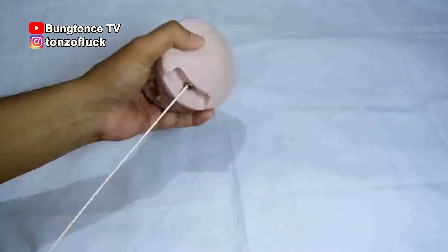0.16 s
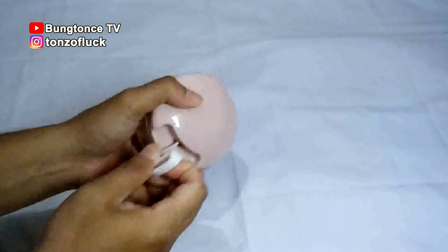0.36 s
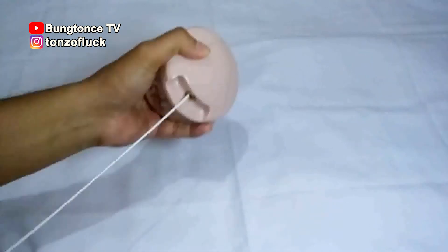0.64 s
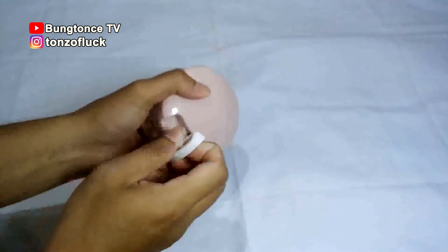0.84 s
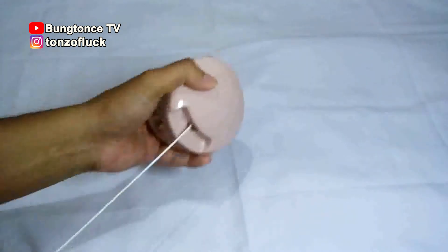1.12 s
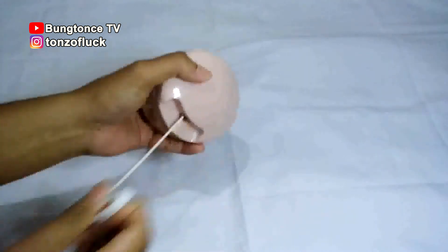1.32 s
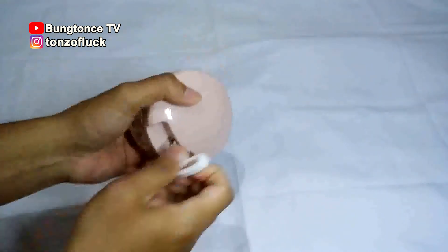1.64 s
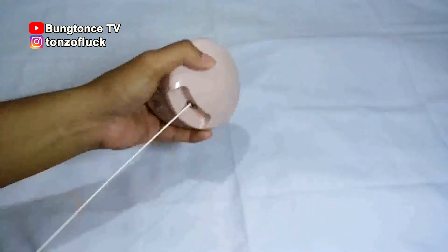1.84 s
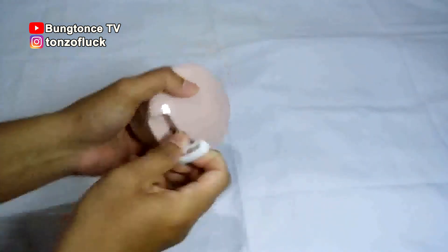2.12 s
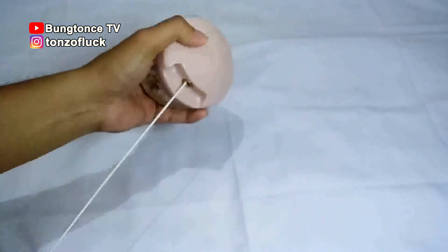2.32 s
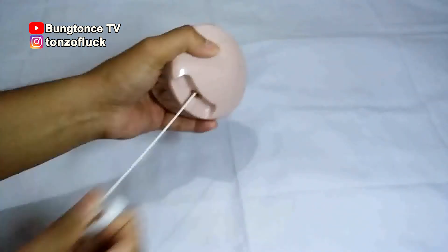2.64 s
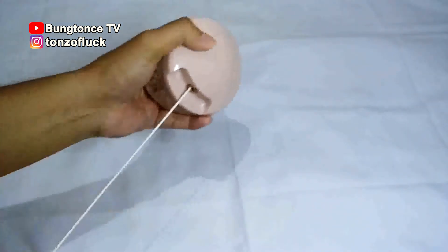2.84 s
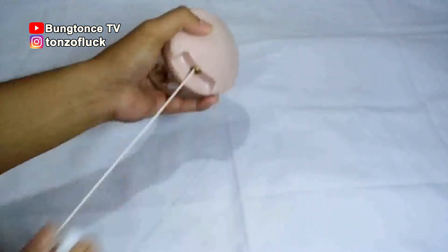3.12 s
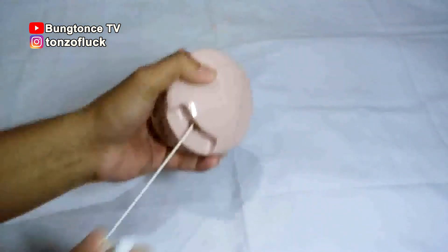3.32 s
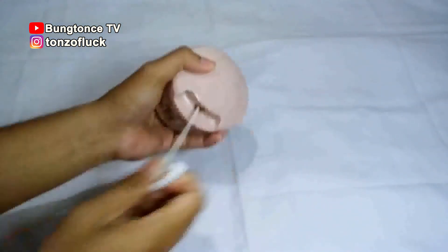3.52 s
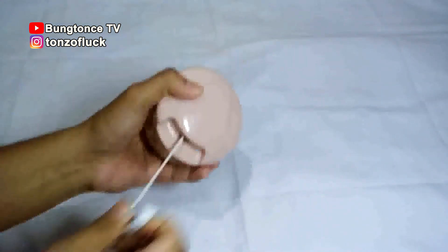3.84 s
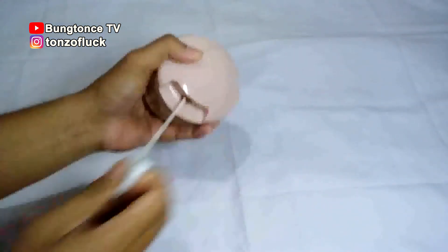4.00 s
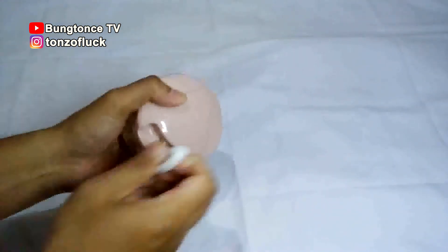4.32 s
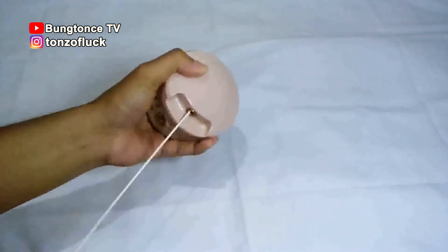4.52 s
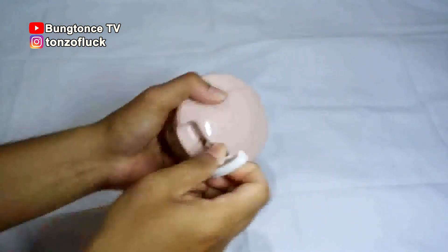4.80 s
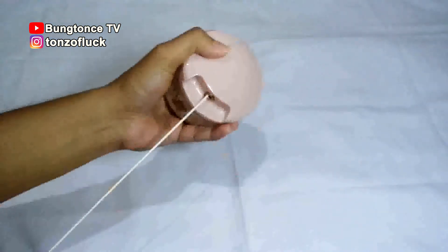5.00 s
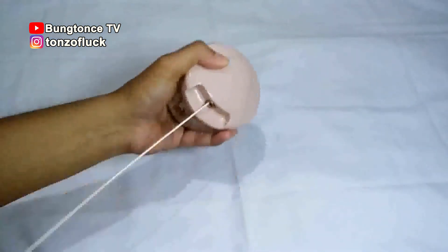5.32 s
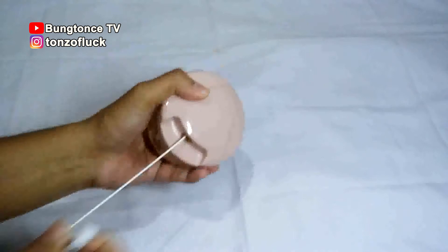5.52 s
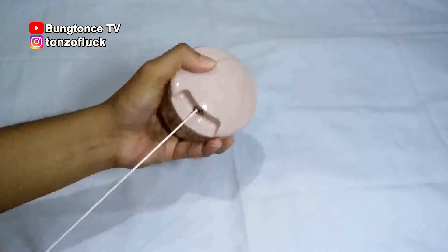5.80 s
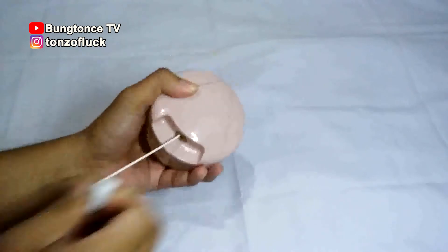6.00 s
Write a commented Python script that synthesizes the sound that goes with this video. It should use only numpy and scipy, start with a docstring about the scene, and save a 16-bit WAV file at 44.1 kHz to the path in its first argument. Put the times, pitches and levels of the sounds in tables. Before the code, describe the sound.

Close to the microphone in a small, quiet room, a cord zips back into a manual food chopper, its ratchet ticking fast. The cord is pulled, the mechanism catches with a clack, and vegetable pieces tumble against the blades and plastic jar in a gritty, knocking rattle. Rewind and pull alternate briskly, a little more than twice a second, ending on one last rasping rewind.

```python
"""A hand-held pull-cord food chopper, worked with fourteen quick pulls close to the microphone in a small room.
Its spring winds the cord in before and after each pull: the cord rasps and sings through the lid
while the pawl ticks over its ratchet. Each pull takes up the slack, the pawl catches with a clack,
and the blades knock vegetable pieces round the plastic jar. Faint room tone lies underneath."""
import sys
import numpy as np
from scipy import signal
from scipy.fft import rfft, irfft
from scipy.io import wavfile
from scipy.ndimage import uniform_filter1d, minimum_filter1d

SR = 44100
rng = np.random.default_rng(int(sys.argv[2]) if len(sys.argv) > 2 else 0)


def store_pcm(level_fs):
    """Save levels as 16-bit WAV."""
    pcm = np.round(np.clip(level_fs, -1, 1) * 32767).astype(np.int16)
    wavfile.write(sys.argv[1], SR, np.atleast_2d(pcm).T)


N = 271656
TIME = np.arange(N) / SR
BLOW_S = .005   # a blow's level is its energy spread over this time


def from_db(db):
    """Decibels to gain."""
    return 10 ** (np.asarray(db) / 20)


def rms_one(x):
    """Scale to an rms of 1."""
    return x / np.sqrt(np.mean(x ** 2) + 1e-20)


def unit_energy(x):
    """Scale to an energy of 1."""
    return x / np.sqrt(np.sum(x ** 2) + 1e-20)


def response(modes, scatter_db=0, detune=0, size=2048):
    """Ring of a part; where it is struck scatters the strengths and pitches of its resonances."""
    hz, width, db = np.transpose(modes)[:, :, None]
    hz = hz * (1 + detune * rng.standard_normal(hz.shape))
    strength = from_db(db + scatter_db * rng.standard_normal(db.shape))
    grid_hz = np.arange(size // 2 + 1) * SR / size
    peaks = strength / (1 + (2 * (grid_hz - hz) / width) ** 2)
    cepstrum = irfft(np.log(np.sum(peaks ** 2, axis=0)) / 2)
    cepstrum[1:size // 2] *= 2   # folding the cepstrum gives minimum phase: nothing sounds early
    cepstrum[size // 2 + 1:] = 0
    return unit_energy(irfft(np.exp(rfft(cepstrum))))


def through(force, modes):
    """A force played through a part's resonances."""
    return signal.oaconvolve(force, response(modes))[:N]


def soften(x, cut_hz):
    """Low-pass: soft contacts and walls lose their treble."""
    return signal.sosfilt(signal.butter(2, cut_hz, fs=SR, output="sos"), x)


def grains(per_s, spread_db):
    """Random tiny contacts of uneven size; rms 1."""
    sizes = from_db(spread_db * np.clip(rng.standard_normal(N), -2, 2))
    signs = rng.choice([-1, 1], N)
    return rms_one(sizes * signs * (rng.random(N) < per_s / SR))


def latest(rows):
    """At every moment: the time since a table's latest event began, then that event's other columns."""
    starts, *columns = np.transpose(rows)
    index = np.maximum(np.searchsorted(starts, TIME, side="right") - 1, 0)
    return [TIME - starts[index]] + [column[index] for column in columns]


def rasp_gain(age, rise_s, slow_s, peak_db, climb_db=11, fall_db=19, creep_db=-43, fade_db_per_s=90):
    """Each return is an arch: the spool speeds up, the hand slows it, the last of the cord creeps in."""
    rising = peak_db - climb_db * (1 - age / rise_s) ** 2
    slowing = peak_db - fall_db * ((age - rise_s) / slow_s) ** 2
    creeping = creep_db - fade_db_per_s * (age - rise_s - slow_s)
    return from_db(np.where(age < rise_s, rising, np.maximum(slowing, creeping)))


def ratchet_ticks(speed, slow_per_s, fast_per_s, jitter, spread_db):
    """One tick a tooth, closer together as the spool spins faster; rms 1."""
    per_s = slow_per_s + (fast_per_s - slow_per_s) * speed
    teeth_passed = np.floor(np.cumsum(per_s) / SR)
    at = np.flatnonzero(np.diff(teeth_passed))
    late, strength = rng.standard_normal((len(at), 2)).T
    moved = np.clip(at + jitter * late * SR / per_s[at], 0, N - 1).astype(int)
    ticks = np.zeros(N)
    ticks[moved] = from_db(spread_db * np.clip(strength, -2, 2)) / np.sqrt(per_s[at])
    return rms_one(ticks)


def chatter(ticks, decay_s):
    """The pawl chatters briefly on each tooth that it drops from; rms 1."""
    decay = np.exp(-1 / (decay_s * SR))
    envelope = signal.lfilter([1], [1, -decay], ticks + 1e-18)
    return rms_one(envelope * rng.standard_normal(N))


def singing(speed, rest_hz, rise, width_hz):
    """The cord sticks and slips in its eye: an unsteady narrow zing that sharpens with speed; rms 1."""
    waver = soften(rng.standard_normal(N) + 1j * rng.standard_normal(N), width_hz)
    phase = 2 * np.pi * np.cumsum(rest_hz * (1 + rise * speed)) / SR
    return rms_one(np.real(waver * np.exp(1j * phase)))


# the cord's returns: (start [s], speeding up [s], slowing [s], rasp peak [dB], relative singing [dB])
CORD_RETURNS = [(-.06, 0.057, 0.11, -26, -10), (0.356, 0.035, 0.13, -27.5, -22),
                (.78, 0.059, 0.11, -25.5, -11), (1.215, 0.071, 0.11, -26.5, -10.5),
                (1.638, .057, 0.12, -26, -18), (2.066, .06, 0.1, -26.5, -3), (2.5, 0.051, 0.12, -26, -21),
                (2.955, 0.052, 0.14, -27, -12), (3.383, 0.064, 0.12, -26.5, -26),
                (3.843, 0.077, 0.11, -24, -11), (4.305, .06, 0.11, -26.5, -31),
                (4.728, 0.048, 0.14, -27, -4), (5.16, 0.046, 0.12, -25.5, -16),
                (5.582, 0.061, 0.12, -25, -7), (6.025, 0.062, 0.12, -26, -8.5)]
# resonances of the spool and of the ratchet: (frequency [Hz], width [Hz], level [dB])
SPOOL_MODES = [(347, 140, -8), (510, 64, -4.5), (750, 210, 2), (1023, 360, 1), (1230, 250, 0.5),
               (1510, 600, -5.5), (2215, 970, -5.5)]
RATCHET_MODES = [(3455, 1330, -8.5), (4410, 400, -3.5), (5130, 1100, -3), (5604, 470, 0.5),
                 (5940, 330, -6.5), (7000, 1450, -17.5), (8160, 470, -19), (9000, 2230, -20),
                 (11540, 2200, -27), (14000, 2100, -30.5)]
def rewind():
    """The spring spins the spool back: the pawl ticks and the cord rubs and sings through its eye."""
    age, rise_s, slow_s, peak_db, sing_db = latest(CORD_RETURNS)
    rasp = rasp_gain(age, rise_s, slow_s, peak_db)
    speed = np.sqrt(rasp / rasp.max())
    rumble = from_db(-4) * rasp ** .96   # the spool's rumble grows more slowly than the rasp
    ticks = ratchet_ticks(speed, slow_per_s=55, fast_per_s=190, jitter=.1, spread_db=2.4)
    ticks = chatter(ticks, decay_s=.00075) * np.sqrt(speed)   # a slow spool lets the pawl down gently
    spool = through(.17 * ticks + 1.083 * grains(per_s=1800, spread_db=6), SPOOL_MODES)
    rubbing = grains(per_s=3000, spread_db=2.5)
    ratchet = through(.78 * soften(ticks, cut_hz=15000) + .62 * rubbing, RATCHET_MODES)
    zing = singing(speed, rest_hz=5500, rise=.045, width_hz=75)
    zing *= speed ** 2 * from_db(5 + sing_db)   # only a fast cord sings
    return (1 - pulling(turn_s=.0054)) * (rumble * spool + rasp * (ratchet + zing))


def room(x, t60_s=.26, level_db=-14.5, size=16384):
    """The small room answers with a short tail, 3 ms behind the direct sound, from the nearest surface."""
    age = np.arange(size) / SR
    tail = rng.standard_normal(size) * from_db(-60 * age / t60_s) * (age > .003)
    tail = unit_energy(soften(tail, cut_hz=16600))
    return from_db(level_db) * signal.oaconvolve(x, tail)[:N]


# bands of the room's still air: (frequency [Hz], width [Hz], level [dB])
AIR_BANDS = [(64, 160, -3), (130, 260, -18), (800, 1100, -11), (4000, 2600, -8.5)]
def room_tone(level_db=-53.5):
    """Still air round the microphone: a faint, steady rumble and hiss."""
    return from_db(level_db) * through(rng.standard_normal(N), AIR_BANDS)


def strokes():
    """Start, catch and end of each pull, in seconds; a pull ends as the next return begins."""
    cycles = zip(CORD_PULLS, PAWL_CATCHES, CORD_RETURNS[1:])
    return np.array([(pull[0], catch[0], back[0]) for pull, catch, back in cycles])


def pulling(turn_s):
    """1 while the cord is drawn out, 0 while it runs back, with a short turn between."""
    inside_s = np.max([np.minimum(TIME - start, end - TIME) for start, _, end in strokes()], axis=0)
    return np.clip(.5 + inside_s / turn_s, 0, 1)


def tumble_gain(drive_s, full_db, rest_db, slack_db=-11.5, taut_db=-.5):
    """The rattle swells as the cord tightens, holds from the catch while the arm drives, then settles."""
    times, levels = [], []
    for (start, catch, end), hold_s, db in zip(strokes(), drive_s, full_db):
        times += [start, catch, catch + BLOW_S, min(catch + hold_s, end - BLOW_S), end]
        levels += [db + slack_db, db + taut_db, db, db, rest_db]
    return from_db(np.interp(TIME, times, levels))


# the cord is drawn out: (start [s], drive after the catch [s], thudding [dB], clatter [dB])
CORD_PULLS = [(.085, 0.057, -28, -29), (.53, 0.16, -30.5, -28.5), (.977, .13, -28.5, -29.5),
              (1.394, 0.14, -29, -30.5), (1.845, 0.045, -26.5, -28.5), (2.271, 0.1, -28.5, -29),
              (2.739, 0.12, -29, -29), (3.163, 0.067, -29.5, -30.5), (3.573, 0.061, -27.5, -28),
              (4.079, 0.13, -29, -28), (4.517, 0.091, -27.5, -31), (4.937, 0.12, -27.5, -28.5),
              (5.37, 0.12, -27.5, -27), (5.781, 0.089, -28, -28.5)]
# resonances of the jar's body, the blades and the jar's wall: (frequency [Hz], width [Hz], level [dB])
JAR_MODES = [(146, 60, -21), (191, 32, -11.5), (287, 110, -5.5), (376, 50, -5), (527, 128, -3.5),
             (647, 83, 0), (764, 173, 0.5), (1000, 430, -2.5), (1171, 125, 1), (1412, 720, 0.5)]
BLADE_MODES = [(1990, 480, -17), (2253, 245, -2), (2450, 200, -3.5)]
WALL_MODES = [(3146, 590, -0.5), (3386, 580, -0.5), (3790, 410, -4), (4380, 550, -2.5), (5200, 1770, -3.5),
              (7340, 540, -21.5), (9130, 2000, -25.5), (13500, 3000, -32.5)]
def tumbling():
    """Vegetable pieces tumble round the jar during each pull: a dense, gritty rattle."""
    _, drive_s, thud_db, clatter_db = np.transpose(CORD_PULLS)
    thud = tumble_gain(drive_s, thud_db, rest_db=-40)
    clatter = tumble_gain(drive_s, clatter_db, rest_db=-40.5)
    big_pieces = .6 * grains(per_s=520, spread_db=6)   # these shake every part at once
    jar = through(big_pieces + .77 * grains(per_s=1800, spread_db=5), JAR_MODES)
    blades = from_db(-4) * through(big_pieces + .75 * grains(per_s=450, spread_db=15), BLADE_MODES)
    wall = from_db(-8) * through(big_pieces + 1.07 * grains(per_s=1900, spread_db=5), WALL_MODES)
    # late in a pull the pieces are pressed outwards and scrape along the wall, ringing two of its modes
    progress = np.interp(TIME, strokes()[:, ::2].ravel(), np.tile([0, 1], len(CORD_PULLS)))
    pressure = np.sin(np.pi * progress ** 2) ** 2
    scrape = from_db(-5.5) * pressure * through(grains(per_s=160, spread_db=7), WALL_MODES[1:3])
    return pulling(turn_s=.01) * (thud * jar + clatter * (blades + wall + scrape))


def blows(rows, parts, part_db, crunch, crunch_s, scatter_db, detune=.014, size=2048):
    """Each blow is a click and a short crunch of after-contacts, ringing each part at its own level."""
    out, age = np.zeros(N + size), np.arange(size) / SR
    for time_s, *levels in rows:
        start = int(time_s * SR)
        for modes, db in zip(parts, np.add(levels, part_db)):
            force = crunch * unit_energy(rng.standard_normal(size) * np.exp(-(age / crunch_s) ** 2))
            force[0] += 1   # the click
            ring = signal.fftconvolve(force, response(modes, scatter_db, detune))[:size]
            out[start:start + size] += from_db(db) * np.sqrt(BLOW_S * SR) * unit_energy(ring)
    return out[:N]


# light ticks of handle and spool: (time [s], jar level [dB], ratchet level [dB])
SLACK_TICKS = [(0.093, -24.5, -27), (0.532, -25.5, -37), (0.978, -35, -34.5), (1.396, -29.5, -40),
               (1.847, -23, -30.5), (2.273, -23, -33), (2.718, -29.5, -36.5), (3.17, -33, -29),
               (3.503, -25, -23), (3.575, -26.5, -31.5), (4.08, -28, -34), (4.092, -39, -27),
               (4.518, -29, -36), (4.9, -22.5, -32), (4.941, -24, -39), (5.782, -23, -33)]
def slack():
    """Handle and spool tick as the cord turns about and its slack is taken up."""
    return blows(SLACK_TICKS, (JAR_MODES, RATCHET_MODES), part_db=[1.5, 1.5],
                 crunch=1.3, crunch_s=.0049, scatter_db=2.5)


# the pawl catches: (time [s], jar level [dB], blade level [dB], lid level [dB], thud in the hand [dB])
PAWL_CATCHES = [(0.152, -15.5, -9, -16.5, -34), (0.559, -18.5, -40, -18.5, -47),
                (1.005, -17, -18.5, -20, -34), (1.424, -16, -37, -22.5, -36),
                (1.867, -16.5, -18.5, -18.5, -40), (2.2951, -11, -10.5, -16.5, -46),
                (2.7626, -14, -15.5, -18.5, -54), (3.179, -17, -15, -19.5, -34),
                (3.693, -18.5, -14, -27.5, -47), (4.102, -13, -26, -21.5, -39),
                (4.543, -13, -19.5, -15.5, -33), (4.966, -12.5, -18, -14.5, -29.5),
                (5.38, -14.5, -16.5, -17.5, -39), (5.805, -12.5, -18, -16, -31)]
# resonances of the lid and of the holding hand: (frequency [Hz], width [Hz], level [dB])
LID_MODES = [(3404, 410, 3), (4060, 150, -1.5), (4760, 2000, -5), (5527, 550, -1.5), (6800, 3100, -25),
             (9300, 1400, -21.5), (11200, 2400, -24), (14300, 2300, -29)]
HAND_MODES = [(69, 74, -0.2), (130, 110, -0.88), (183, 73, 5)]
def pawl(skid_lead_s=.002):
    """The pawl skids on to its tooth, then slams home and chatters as it jerks the blades round."""
    skids = [(time_s - skid_lead_s, lid_db) for time_s, _, _, lid_db, _ in PAWL_CATCHES]
    skid = blows(skids, (LID_MODES,), part_db=[-10], crunch=4.3, crunch_s=.017, scatter_db=5.5)
    clack = blows(PAWL_CATCHES, (JAR_MODES, BLADE_MODES, LID_MODES, HAND_MODES), part_db=[.53, 0, 1, 0],
                  crunch=2.43, crunch_s=.0075, scatter_db=1.5)
    return soften(skid, cut_hz=8900) + clack


def stray_knocks(per_pull=3, jar_db=-39, blade_db=-33, wall_db=-42, spread_db=5.5):
    """Lighter knocks fall at random in the middle of each pull; rows as in PIECE_KNOCKS."""
    _, catch, end = np.repeat(strokes(), per_pull, axis=0).T
    times = catch + rng.uniform(.1, .8, len(catch)) * (end - catch)
    levels = rng.normal([jar_db, blade_db, wall_db], spread_db, (len(catch), 3))
    return np.column_stack([times, levels])


# big pieces are struck: (time [s], jar level [dB], blade level [dB], wall level [dB])
PIECE_KNOCKS = [(.165, -29, -30, -32), (.197, -20, -38, -37), (.217, -23, -26, -34), (.245, -21, -25, -31),
                (.57, -24, -19, -37), (.588, -35, -18, -37), (.6, -28, -13.5, -26), (.625, -23, -23, -40),
                (.664, -21, -25, -30), (.734, -28, -22, -35), (1.034, -41, -22, -38),
                (1.061, -21.5, -44, -27.5), (1.09, -21.5, -16, -42), (1.103, -25, -19.5, -20),
                (1.142, -25, -27, -35), (1.178, -35, -30, -36), (1.439, -24, -38, -38),
                (1.452, -21, -13.5, -25), (1.488, -22.5, -22, -29), (1.508, -34, -24, -33),
                (1.53, -24.5, -19, -30), (1.57, -44, -21, -29), (1.581, -35, -37, -28),
                (1.917, -27, -16.5, -26.5), (1.962, -20.5, -31, -27), (2.005, -22.5, -20, -31),
                (2.038, -35, -42, -33), (2.35, -21.5, -40, -29), (2.387, -24, -27, -28),
                (2.428, -22, -41, -43), (2.449, -49, -20.5, -32), (2.743, -30.5, -21.5, -36),
                (2.815, -23.5, -23, -31), (2.841, -17.5, -29, -27), (2.884, -21.5, -14.5, -25),
                (3.219, -21, -42, -33), (3.257, -19.5, -43, -26.5), (3.27, -41, -23, -46),
                (3.3, -25.5, -28, -35), (3.605, -30, -15.5, -30.5), (3.64, -25.5, -21.5, -35),
                (3.682, -26, -18, -29), (3.718, -25, -22, -24), (3.73, -18, -25, -25.5),
                (4.114, -40, -20, -40), (4.151, -23, -36, -40), (4.165, -43, -16.5, -28.5),
                (4.18, -40, -23, -29), (4.185, -16.5, -19, -30), (4.207, -30, -18.5, -27),
                (4.228, -27, -20, -48), (4.264, -35, -35, -37), (4.624, -22.5, -23, -25),
                (4.653, -23.5, -29, -28), (4.978, -37, -11.5, -21), (5.014, -23.5, -26, -27.5),
                (5.055, -33, -13.5, -21.5), (5.087, -24.5, -28, -32), (5.092, -41, -16.5, -23),
                (5.106, -44, -18.5, -25), (5.455, -21.5, -37, -42), (5.465, -28, -23.5, -20.5),
                (5.529, -28, -26, -36), (5.549, -43, -26, -47), (5.849, -20.5, -41, -41),
                (5.862, -41, -22, -25.5), (5.874, -30, -14, -22.5), (5.919, -22, -22, -24.5),
                (5.955, -46, -23.5, -41)]
def knocks():
    """The blades hit a piece or fling it against the wall: hard knocks above the rattle."""
    hits = list(PIECE_KNOCKS) + list(stray_knocks())
    return blows(hits, (JAR_MODES, BLADE_MODES, WALL_MODES), part_db=[.3, .1, .6],
                 crunch=2.1, crunch_s=.0035, scatter_db=2, detune=.027)


def scene():
    """The chopper close up, the small room behind it, in mono."""
    chopper = slack() + pawl() + knocks() + tumbling() + rewind()
    return (chopper + room_tone() + room(chopper))[None]


def limiter(x, top, size=90):
    """The gain ducks for a moment round each peak that passes the top."""
    needed = np.minimum(1, top / (np.abs(x) + 1e-9))
    return x * uniform_filter1d(minimum_filter1d(needed, size), size)


def record(dry, low_cut_hz=48, high_cut_hz=15800):
    """The microphone loses the deep bass, a limiter holds the peaks, and the highest treble is cut."""
    low_cut = signal.butter(2, low_cut_hz, "high", fs=SR, output="sos")
    high_cut = signal.ellip(10, .2, 80, high_cut_hz, fs=SR, output="sos")
    limited = limiter(signal.sosfilt(low_cut, dry), top=.6)
    return signal.sosfilt(high_cut, limited)


dry = scene()
out = record(dry)
store_pcm(out)
```